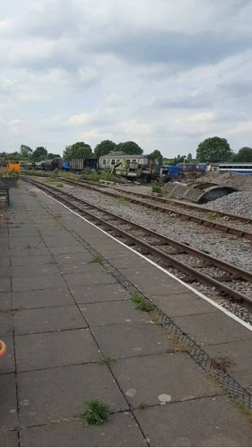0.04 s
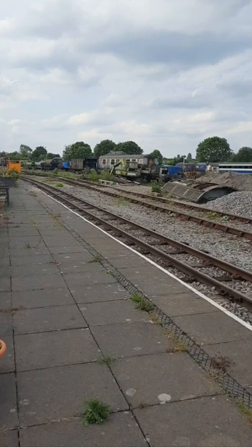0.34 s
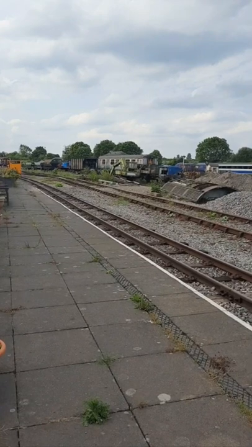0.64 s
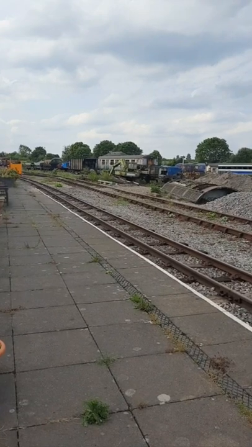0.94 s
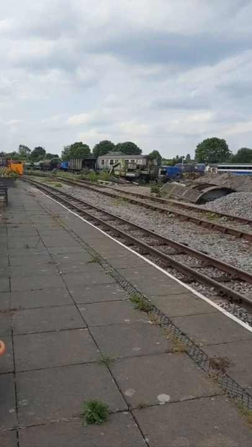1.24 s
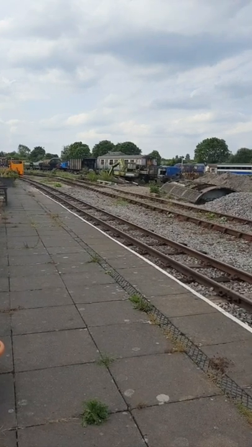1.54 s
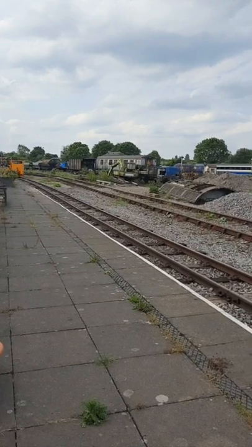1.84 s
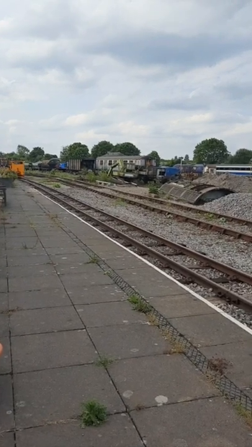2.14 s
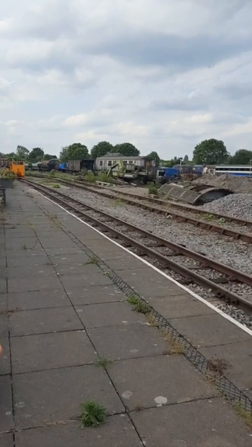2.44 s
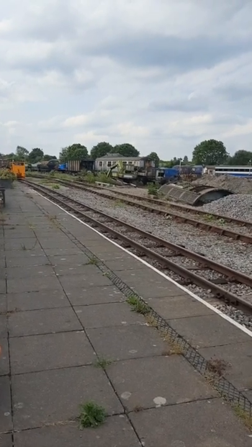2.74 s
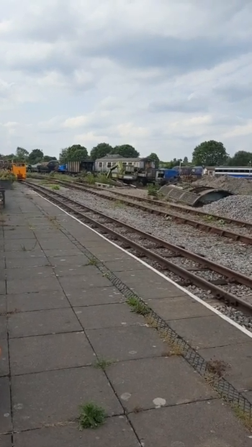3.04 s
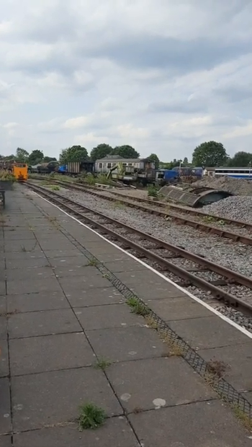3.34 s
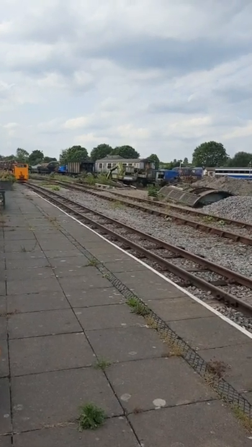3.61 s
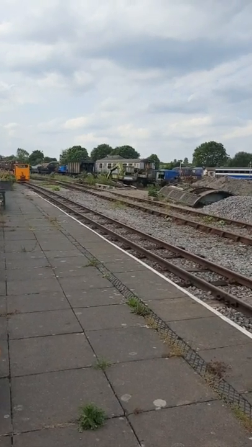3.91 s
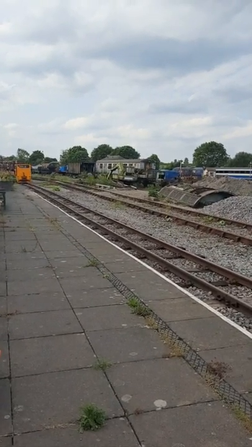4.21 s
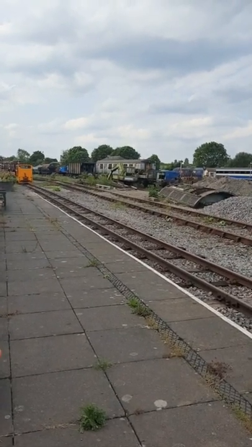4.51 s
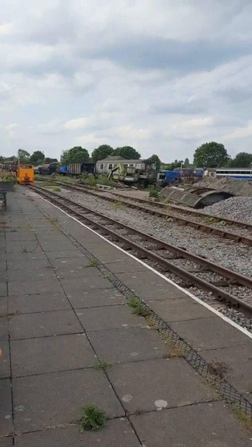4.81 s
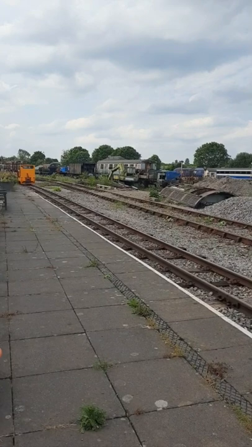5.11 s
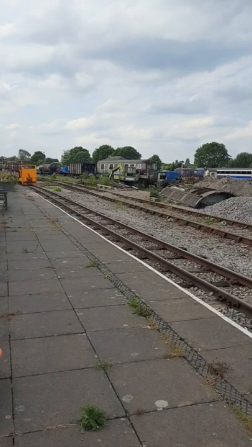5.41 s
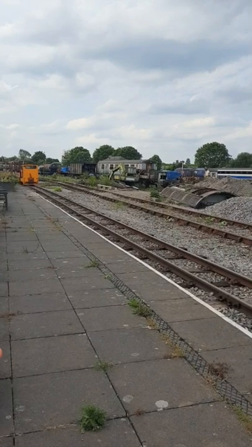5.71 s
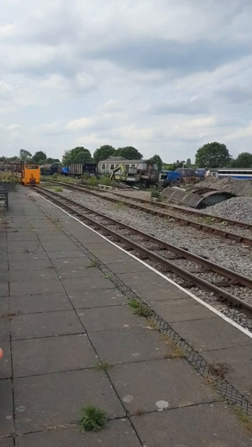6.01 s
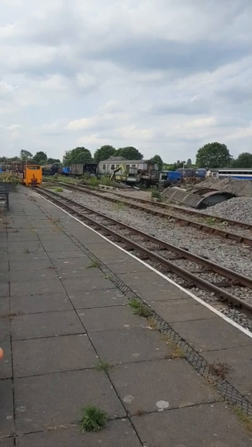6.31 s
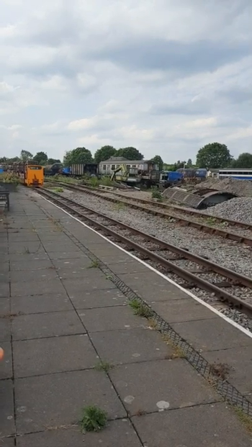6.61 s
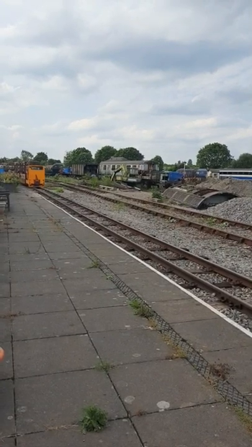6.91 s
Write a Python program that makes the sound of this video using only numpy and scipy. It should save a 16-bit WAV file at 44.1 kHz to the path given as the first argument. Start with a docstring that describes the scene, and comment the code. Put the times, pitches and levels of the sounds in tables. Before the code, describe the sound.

A small diesel locomotive chugs at an even pace some way off in an open rail yard, heard from a platform. Its low exhaust throbs with a hollow, pulsing hum. As it creeps closer the sound grows slightly louder and brighter, with rapid metallic knocking, a light casing rattle and a soft hiss coming forward. A few dull thumps and faint ticks pass.

```python
"""A low, distant chug is heard first: a small three-cylinder diesel locomotive creeps towards a platform.
Puffs of gas drive the exhaust, the tail pipe resonates in two booms per engine cycle, and two knocks
per firing ring the block and its casing; all of it slowly grows louder. Turbulence at the fan and
running gear adds a soft hiss, and a few dull thumps, ticks, swishes and a faint bird pass.
Two microphone ports hear the scene from the left."""
import sys
import numpy as np
from scipy import signal
from scipy.fft import rfft, irfft
from scipy.io import wavfile
from scipy.ndimage import uniform_filter1d

SR = 44100
rng = np.random.default_rng(int(sys.argv[2]) if len(sys.argv) > 2 else 0)


def unload_wav(signal):
    """Save mono or channel-first audio to the path in sys.argv[1] as 16-bit WAV at rate SR, clipped to [-1, 1]."""
    wavfile.write(
        sys.argv[1],
        SR,
        np.round(np.clip(np.atleast_2d(signal).T, -1, 1) * 32767).astype(np.int16),
    )


N = 315315
TIME = np.arange(N) / SR
BINS = np.maximum(np.fft.rfftfreq(N, 1 / SR), 1)
FIRINGS_PER_CYCLE = 3

# engine speed: (time [s], firing rate [Hz])
FIRING_RATE = [(0.0, 19.518), (0.5, 19.406), (1.0, 18.814), (1.5, 19.262), (2.0, 19.327), (3.0, 19.328),
               (4.0, 19.305), (5.0, 19.233), (6.0, 19.154), (7.15, 19.193)]
# pipe booms in a cycle, soft then strong: (place [firings], relative level [dB], half length [firings])
BOOM_PATTERN = [(1.22, -3.5, .42), (2.38, 0, .3)]
# modes of the block: (frequency [Hz], relative level at mid-scene [dB], drift [dB/s], t60 [s])
BLOCK_MODES = [(1748, -2.5, 1.5, 0.041), (1937, -1.5, 1.5, 0.03), (2130, -10, 0, 0.02),
               (2158, -2.5, -0.5, 0.036), (2208, -4.5, -1.5, 0.039), (2450, -12, -3.5, 0.027),
               (2517, -6, -1, 0.04)]
# knocks harder than the rest: (time [s], relative level [dB], frequency [Hz])
HARD_BLOWS = [(2.31, -45, 2174), (4.642, -47, 2140), (4.665, -49.8, 2150), (4.821, -49.6, 2024),
              (5.134, -44.5, 2121), (5.213, -49.3, 2046), (5.288, -46.5, 2145), (5.393, -49.4, 2091),
              (5.424, -48.8, 2109), (5.448, -45, 2144), (5.759, -48, 2001), (5.79, -49, 2088),
              (6.154, -47, 2214), (6.177, -44, 2051), (6.23, -51, 2006), (6.382, -47, 2000),
              (6.49, -48.7, 2127), (6.696, -44.5, 2204), (6.746, -46, 2034), (6.801, -45, 2194),
              (6.825, -49.2, 2131), (6.852, -49, 2036), (6.967, -52, 1968), (6.993, -55, 2030),
              (7.034, -43.5, 2005), (7.113, -47, 2132)]


def from_db(db):
    """Amplitude ratio of a level in decibels."""
    return 10 ** (np.asarray(db) / 20)


def rms_one(x):
    """Normalisation to unit rms."""
    return x / np.sqrt(np.mean(x ** 2) + 1e-20)


def in_time(rows):
    """Linear interpolation of each column after the time column, at every sample."""
    times, *columns = np.transpose(rows)
    return [np.interp(TIME, times, column) for column in columns]


def over_hz(points):
    """Interpolation of a table at every bin, on a logarithmic frequency axis."""
    hz, value = np.transpose(points)
    return np.interp(np.log(BINS), np.log(hz), value)


def stray(span_s):
    """Low-pass noise: a random wander of unit rms."""
    size = max(int(span_s * SR), 1)
    return rms_one(uniform_filter1d(uniform_filter1d(rng.standard_normal(N), size), size))


def swells(rows):
    """Superposed Gaussian envelopes, from rows of (time [s], height, half length [s])."""
    out = np.zeros(N)
    for s, height, half_s in rows:
        near = slice(*np.searchsorted(TIME, [s - np.pi * half_s, s + np.pi * half_s]))
        out[near] += height * np.exp(-((TIME[near] - s) / half_s) ** 2)
    return out


def tone_bursts(rows, rise_s, fall_s):
    """Wave packets that swell and die, from rows of (time [s], level [dB], frequency [Hz])."""
    out = np.zeros(N)
    for s, db, hz in rows:
        near = slice(*np.searchsorted(TIME, [s - np.pi * rise_s, s + np.pi * fall_s]))
        age = TIME[near] - s
        envelope = np.exp(-(age / np.where(age < 0, rise_s, fall_s)) ** 2)
        out[near] -= np.sqrt(2) * from_db(db) * envelope * np.sin(2 * np.pi * hz * age)
    return out


def turbulence(gain):
    """Partly coherent stereo noise: scattering by ground and yard makes the two sides unlike."""
    # likeness of the two sides: (frequency [Hz], coherence [0..1])
    coherence = [(60, 0.63), (130, 0.9), (300, 0.95), (480, 0.81), (600, 0.42), (900, 0.25), (1300, 0.7),
                 (2000, 0.55), (2500, 0.87), (3200, 0.1), (6000, 0.11), (12000, 0.13)]
    alike = np.clip(over_hz(coherence), 0, 1)
    mid, side = rng.standard_normal((2, len(BINS))) + 1j * rng.standard_normal((2, len(BINS)))
    spectrum = np.sqrt(1 + alike) * mid + np.sqrt(1 - alike) * side * [[1], [-1]]
    return rms_one(irfft(gain * spectrum, N))


def coloured(spectrum):
    """Band-limited noise, shaped by rows of (frequency [Hz], relative density [dB])."""
    inside = (BINS > spectrum[0][0]) & (BINS < spectrum[-1][0])
    return turbulence(from_db(over_hz(spectrum)) * inside)


def resonant(peaks):
    """Noise through narrow resonances, from rows of (frequency [Hz], width [Hz], relative level [dB])."""
    return turbulence(sum(from_db(db) / (1 + (2 * (BINS - hz) / width) ** 2) for hz, width, db in peaks))


def ring(force, hz, t60):
    """A damped oscillator: each impulse starts a sine that falls 60 dB in t60 seconds."""
    decay, step = from_db(-60 / (t60 * SR)), 2 * np.pi * hz / SR
    return signal.lfilter([0, np.sin(step)], [1, -2 * decay * np.cos(step), decay ** 2], force + 1e-18)


def steadied(x, share, span_s):
    """Compression of slow swells: an engine delivers much the same energy on every stroke."""
    power = uniform_filter1d(np.mean(x ** 2, axis=0), max(int(span_s * SR), 1))
    return rms_one(x / (np.abs(power) + 1e-6) ** (share / 2))


def blows(crank, pattern, scatter_db, jitter_s):
    """A quasi-periodic impulse train: each blow of the cycle varies a little in strength and time."""
    clicks = np.zeros(N)
    cycles = np.arange(0, crank[-1], FIRINGS_PER_CYCLE)
    for place, level_db in pattern:
        chance = rng.standard_normal((len(cycles), 2))
        due_s = np.interp(cycles + place, crank, TIME, right=2 * TIME[-1])
        at = ((due_s + jitter_s * chance[:, 0]) * SR).astype(int)
        inside = (at >= 0) & (at < N)
        clicks[at[inside]] += from_db(level_db + scatter_db * chance[inside, 1])
    return clicks


def throb(clicks, rise_s, fall_s, wash):
    """Energy envelope of blows that build and decay; a steady wash stands for the yard's echoes."""
    power = clicks ** 2
    for seconds in (rise_s, fall_s):
        power = signal.lfilter([1], [1, -np.exp(-1 / (seconds * SR))], power + 1e-18)
    return rms_one(np.sqrt(power / power.mean() + wash))


def surge(crank, booms, wash):
    """Periodic envelope: rounded swells in every engine cycle add in power to a steady wash."""
    half_cycle = FIRINGS_PER_CYCLE / 2
    power = np.zeros(N)
    for place, db, half_length in booms:
        offset = (crank - place + half_cycle) % FIRINGS_PER_CYCLE - half_cycle
        power += from_db(db) ** 2 * np.exp(-(offset / half_length) ** 2)
    return rms_one(np.sqrt(power / power.mean() + wash))


def microphone_hiss():
    """Self-noise of the microphones: a stationary treble floor."""
    # noise floor: (frequency [Hz], relative density [dB])
    floor_spectrum = [(2500, -11), (4000, -6.5), (6000, -0.5), (8000, -3), (11000, -18), (15500, -4.5)]
    return from_db(-77) * coloured(floor_spectrum)


def bird():
    """Frequency glides: each far whistle is a thin sine that falls as it fades in and out."""
    # whistles: (start [s], length [s], first frequency [Hz], last frequency [Hz], level [dB])
    whistles = [(1.96, .2, 8750, 8450, -80), (4.98, .19, 8350, 6700, -75)]
    out = np.zeros(N)
    for s, length_s, start_hz, end_hz, db in whistles:
        along = np.clip((TIME - s) / length_s, 0, 1)
        hz = start_hz + (end_hz - start_hz) * along
        out += from_db(db) * np.sin(np.pi * along) * np.sin(2 * np.pi * np.cumsum(hz) / SR)
    return out


def swishes():
    """Amplitude modulation of treble noise by brief, soft swells."""
    # swishes: (time [s], level [dB], half length [s])
    events = [(-0.002, -64.5, 0.079), (0.184, -72, 0.21), (0.663, -63, 0.15), (1.346, -73.5, .07),
              (1.949, -78, .08), (2.64, -68, 0.3), (4.683, -63.5, 0.33)]
    # their colour: (frequency [Hz], relative density [dB])
    spectrum = [(2300, -3.5), (2550, -3.5), (2850, -4.5), (3300, -15.5), (3700, -12), (3920, -5),
                (4150, -12.5), (4600, -10.5), (5100, -6.5), (5800, -5.5), (6700, -5), (7500, -14.5),
                (9200, -22.5), (11000, -17.5), (15500, -29)]
    envelope = sum(from_db(db) * np.exp(-((TIME - s) / half_s) ** 2) for s, db, half_s in events)
    return coloured(spectrum) * envelope


def ticks(spread):
    """Exponentially decaying noise transients: clicks and scuffs, the longer ones starting more softly."""
    # ticks and scuffs: (time [s], relative level [dB], band centre [Hz], decay [s])
    events = [(1.891, -61, 3700, 0.08), (1.999, -65, 3400, 0.056), (2.308, -53, 2910, 0.0067),
              (3.521, -57, 3000, 0.011), (3.7, -51.5, 3584, 0.021), (3.714, -51, 1600, 0.039),
              (4.258, -54, 8200, .003), (5.525, -63, 8000, .02)]
    out, age = np.zeros((2, N)), TIME[:SR // 4]
    for s, db, hz, fall_s in events:
        band = signal.butter(2, [hz / (1 + spread), hz * (1 + spread)], "band", fs=SR, output="sos")
        noise = rms_one(signal.sosfilt(band, rng.standard_normal((2, len(age)))))
        envelope = (1 - np.exp(-10 * age / fall_s)) * np.exp(-age / fall_s)
        start = int(s * SR)
        out[:, start:start + len(age)] += from_db(db) * envelope * noise
    return out


def thumps():
    """Low-frequency wave packets: each dull thump is a few deep, round cycles."""
    # thumps that stand out of the chug: (time [s], relative level [dB], frequency [Hz])
    events = [(0.469, -30, 121), (1.421, -27.5, 215), (3.091, -35, 110.4), (3.711, -33.5, 132),
              (3.862, -33, 141), (4.185, -29.5, 148), (5.397, -24.5, 136), (5.443, -35, 165),
              (5.782, -32.5, 128.7), (5.841, -37, 125), (6.151, -26, 111), (6.812, -30.5, 176.2),
              (6.959, -29, 236.2)]
    return from_db(-3) * tone_bursts(events, rise_s=.008, fall_s=.012)


def fan_and_gear():
    """Broadband noise of fan and running gear; its top carries only a short way, so nearing brightens it."""
    # growth of the hiss: (time [s], level [dB])
    hiss_level = [(0, -79.5), (1.2, -76.5), (1.5, -74.5), (2.2, -70), (2.9, -69), (3.3, -71.5),
                  (3.8, -63.5), (5.15, -66.5), (5.7, -62), (6.5, -62), (6.7, -60), (6.95, -57.5),
                  (7.15, -60)]
    # main hiss: (frequency [Hz], relative density [dB])
    hiss_spectrum = [(2200, -38), (2900, -3), (3500, -3.5), (4500, -1), (6000, -3), (7500, -4.5),
                     (9000, -11.5), (10000, -12), (11200, -11), (12200, -18), (15500, -36)]
    # highest hiss: (frequency [Hz], relative density [dB])
    fine_spectrum = [(9300, -5), (10500, 0.5), (11500, -9), (12200, -8), (13200, -7.5), (15500, -12.5)]
    # faint whine of the fan: (frequency [Hz], width [Hz], relative level [dB])
    whine_peaks = [(5340, 80, -5), (5960, 240, -6), (6600, 150, -7)]
    fine_end_db, fine_rise_db_per_s = -69, 7
    hiss_db, = in_time(hiss_level)
    fine = from_db(fine_end_db + fine_rise_db_per_s * (TIME - TIME[-1])) * coloured(fine_spectrum)
    return from_db(hiss_db) * (coloured(hiss_spectrum) + from_db(-9.5) * resonant(whine_peaks)) + fine


def drive_whine():
    """Random frequency and amplitude modulation make the drive's thin, sinking tone flutter."""
    # course of the whine: (time [s], frequency [Hz], level [dB])
    course = [(0, 770, -73.5), (1.15, 768, -67.5), (1.4, 766, -62), (1.8, 764, -68.5), (2.2, 760, -58),
              (2.7, 757, -65.5), (3.0, 753, -68.5), (3.5, 747, -61.5), (4.5, 738, -65), (5.2, 722, -63),
              (7.15, 706, -65.5)]
    stray_hz, flutter_db = 6, 5
    hz, db = in_time(course)
    tone = np.cos(2 * np.pi * np.cumsum(hz + stray_hz * stray(.03)) / SR)
    return from_db(db) * rms_one(tone * from_db(flutter_db * stray(.035)))


def clangs():
    """A loose casing panel vibrates in short swells, randomly modulated in pitch and level."""
    # clangs: (time [s], relative level [dB], frequency [Hz])
    events = [(0.708, -52.5, 653), (1.402, -51, 767), (2.312, -49, 758), (2.639, -47.5, 768),
              (3.285, -51, 748), (3.751, -47.5, 708), (4.143, -51.5, 751), (4.278, -48.5, 716),
              (4.308, -53, 690.6), (5.135, -54, 720), (5.392, -47.5, 793), (5.851, -47, 729),
              (5.941, -48, 741), (6.126, -53, 705), (6.361, -46.5, 914), (6.712, -44.5, 715),
              (6.866, -48, 682), (7.005, -48.5, 703)]
    half_s, waver_hz, rattle_db = 0.027, 8.9, 3
    waver = np.cumsum(waver_hz * stray(0.0086)) / SR
    out = np.zeros(N)
    for s, db, hz in events:
        near = np.abs(TIME - s) < .1
        envelope = from_db(db - 1) * np.exp(-((TIME[near] - s) / half_s) ** 2)
        out[near] += envelope * np.cos(2 * np.pi * (hz * TIME[near] + waver[near]))
    return out * from_db(rattle_db * stray(0.0032))


def casing_panels(crank):
    """Narrow panel resonances swell on every second engine cycle and rattle unevenly in between."""
    # resonances: (frequency [Hz], width [Hz], relative level at mid-scene [dB], drift [dB/s])
    resonances = [(708, 38, -8, 0.7), (772, 53, -4.5, 0.0), (912, 57, -14.5, 2.5), (1122.5, 20, -9.5, 0.36),
                  (2510, 6.1, -16.5, 2.1)]
    swell_db, crest_firings, flutter_db = 4.5, 3.1, 5
    swell = from_db(swell_db * np.cos(np.pi * (crank - crest_firings) / FIRINGS_PER_CYCLE))
    panels = np.zeros((2, N))
    for hz, width, db, drift in resonances:
        singing = steadied(resonant([(hz, width, 0)]), share=0.15, span_s=0.16)
        panels += from_db(db + drift * (TIME - TIME.mean())) * singing
    return rms_one(panels * swell * from_db(flutter_db * stray(0.021)))


def struck_block(strikes):
    """Modal response of the block, band-passed by the casing; the balance of the modes flickers."""
    flicker_db = 3.5
    casing_band = signal.butter(2, [1730, 2680], "band", fs=SR, output="sos")
    modes = np.zeros((2, N))
    for hz, db, drift, t60 in BLOCK_MODES:
        level_db = db + drift * (TIME - TIME.mean()) + flicker_db * stray(0.024)
        modes += from_db(level_db) * ring(strikes, hz, t60)
    return signal.sosfilt(casing_band, modes)


def hard_knocks():
    """Free vibration after impact: short blows, each at its own pitch, leave the block ringing."""
    blow = tone_bursts(HARD_BLOWS, rise_s=.0025, fall_s=.003)
    ringing = blow.std() * rms_one(sum(ring(blow, hz, t60) for hz, _, _, t60 in BLOCK_MODES))
    return from_db(-3) * (blow + from_db(-6) * ringing)


def engine_body(crank):
    """Impact excitation: combustion and valve gear ring the block, and the casing rattles in step."""
    # the engine coming into the open: (time [s], relative casing level [dB], relative knock level [dB])
    levels = [(0.0, -57, -66.5), (0.18, -62.5, -73), (.36, -63, -76), (.47, -64, -71), (.6, -61, -73),
              (1.23, -61.5, -73), (1.39, -60, -70), (1.51, -59.5, -65), (2.15, -57, -64),
              (2.33, -56.5, -59.5), (2.47, -60, -65.5), (2.63, -58.5, -62.5), (2.87, -59.5, -65),
              (3.78, -55, -60), (3.9, -56.5, -60), (7.05, -55, -55), (7.15, -54, -57.5)]
    # knocks in one cycle: (place [firings], relative level [dB])
    knock_pattern = [(0.37, 5.9), (0.751, 9.2), (1.358, 12), (1.79, 11.1), (2.342, 12.3), (2.791, 10.8)]
    # scattered knocks: (frequency [Hz], relative density [dB])
    knock_spectrum = [(1300, -21), (1650, -6.5), (1900, -6), (2150, -3.5), (2350, -7), (2550, -8.5),
                      (2800, -13), (3600, -25.5)]
    # casing rattle: (frequency [Hz], relative density [dB])
    rattle_spectrum = [(430, -25), (560, 0.5), (650, 1.5), (725, 0.5), (790, -1), (880, -3), (1050, -5),
                       (1220, -7.5), (1450, -14), (2000, -63)]
    casing_db, knock_db = in_time(levels)
    knocks = blows(crank, knock_pattern, scatter_db=1.3, jitter_s=0.0012)
    # the usual knock gives way to a hard one
    knocks *= np.clip(1 - swells([(s, 1, .006) for s, _, _ in HARD_BLOWS]), .5, 1)
    # each strike is a click plus a rough burst of a few milliseconds
    strikes = 1.2 * rms_one(knocks) + turbulence(1) * throb(knocks, rise_s=.0015, fall_s=.0015, wash=0)
    block = steadied(struck_block(strikes), share=.3, span_s=.026)
    scattered = coloured(knock_spectrum) * throb(knocks, rise_s=0.0015, fall_s=0.003, wash=4.4)
    rattle = coloured(rattle_spectrum) * throb(knocks, rise_s=0.0055, fall_s=0.006, wash=2.1)
    panels = casing_panels(crank) * throb(knocks, rise_s=0.0033, fall_s=.008, wash=2.6)
    return (from_db(knock_db) * (from_db(-4.0) * block + from_db(0.34) * scattered)
            + from_db(casing_db) * (from_db(1.68) * rattle + from_db(-5) * panels))


def exhaust_hum(crank):
    """Harmonics of the firing rate: each puff pushes, then sucks; their balance shifts on approach."""
    # harmonics: (order [multiple of the firing rate], level far off [dB], level close by [dB])
    harmonics = [(2, -61.5, -63), (3, -53, -45), (4, -53, -54.5), (5, -57, -53.5), (6, -56.5, -49),
                 (7, -59.5, -53)]
    close_s, close_span_s, turn_firings = 4.786, .3, .425
    close = .5 + .5 * np.tanh((TIME - close_s) / close_span_s)
    phase = 2 * np.pi * (crank - turn_firings)
    return -np.sqrt(2) * sum(from_db(far_db + (near_db - far_db) * close) * np.sin(order * phase)
                             for order, far_db, near_db in harmonics)


def tail_pipe(crank):
    """Pipe resonance: one note swells and bends with each boom; loud booms impose their own pitch."""
    # the ringing pipe: (time [s], relative level [dB])
    levels = [(0, -42), (.45, -41), (.75, -40), (1.05, -40.5), (1.4, -43.5), (1.85, -44), (2.45, -41.5),
              (2.8, -43.5), (3.1, -45), (3.3, -42.5), (3.7, -40.5), (4.45, -38.5), (4.95, -42), (5.5, -39),
              (6.2, -42), (6.85, -37.5), (7.15, -51)]
    # resonances of the pipe: (frequency [Hz], width [Hz], relative level [dB])
    resonances = [(297.5, 19, -4.5), (317, 27, -8), (335.2, 14, -5)]
    # booms that stand out: (time [s], relative level [dB], frequency [Hz], half length [s])
    loud_booms = [(0.684, -34.1, 322.2, 0.031), (0.746, -32, 322.5, 0.022), (1.069, -31.5, 318, 0.012),
                  (3.097, -35, 332, 0.012), (4.027, -35.5, 327, 0.019), (4.181, -31, 331.7, 0.015),
                  (4.326, -33.7, 326, 0.014), (4.443, -33, 320.7, 0.012), (4.493, -32, 329.3, 0.014),
                  (5.261, -35, 322.7, 0.0089), (5.426, -31.1, 336, 0.016), (5.516, -30, 335.2, 0.012),
                  (5.567, -34, 339, 0.019), (5.665, -31.0, 319.1, 0.013), (5.739, -34, 328.8, 0.025),
                  (5.892, -32.5, 327, 0.022), (6.042, -32, 326, 0.02), (6.152, -30.5, 324.5, 0.021),
                  (6.206, -31.5, 330.2, 0.015), (6.36, -31.2, 332, 0.019), (6.452, -31, 325, 0.014),
                  (6.521, -30.5, 328.5, 0.016), (6.669, -28.5, 333, 0.012), (6.757, -33, 321.4, 0.018),
                  (6.84, -30.5, 332.5, 0.022), (6.938, -31.5, 331, 0.016), (6.97, -30, 324, 0.012),
                  (7.142, -26, 335, 0.013)]
    order = 50 / 3   # the multiple of the firing rate that the pipe favours
    bend_hz, stray_hz, scatter_db = 14, 2.2, 1.5
    level_db, = in_time(levels)
    firing_hz, = in_time(FIRING_RATE)
    swell = surge(crank, BOOM_PATTERN, wash=.06)
    loud_weight = swells([(s, 1, half_s) for s, _, _, half_s in loud_booms])
    usual_weight = np.clip(1 - loud_weight, 0, 1) ** 2
    usual_hz = order * firing_hz + bend_hz * (swell - swell.mean()) + stray_hz * stray(.12)
    weighted_loud_hz = swells([(s, hz, half_s) for s, _, hz, half_s in loud_booms])
    note_hz = (usual_weight * usual_hz + weighted_loud_hz) / (usual_weight + loud_weight)
    note = rms_one(np.cos(2 * np.pi * np.cumsum(note_hz) / SR))
    breath = from_db(-8) * resonant(resonances)
    tone = steadied(note + breath, share=0.6, span_s=0.04)
    usual_gain = usual_weight * swell * from_db(level_db - 0.5 + scatter_db * stray(.12))
    loud_gain = swells([(s, from_db(db - 0.8), half_s) for s, db, _, half_s in loud_booms])
    return tone * (usual_gain + loud_gain)


def exhaust(crank):
    """Pulsating flow: puffs of gas modulate a low chug and the silencer's drone, beside hum and pipe."""
    # relative levels of the bands on approach: (time [s], chug [dB], drone [dB], upper skirt [dB])
    levels = [(0, -37, -49, -44), (0.3, -47, -45.5, -49.5), (0.7, -39.5, -44, -47),
              (1.1, -40.5, -43.5, -43), (1.45, -41, -37.5, -45.5), (1.9, -41.5, -45, -47),
              (2.3, -38.5, -42, -45), (2.85, -44, -48, -48.5), (3.1, -39.5, -42, -46.5),
              (3.35, -46.5, -50, -45), (3.9, -37, -42, -43.5), (4.3, -41, -42.5, -45.5),
              (4.75, -41.5, -46.5, -46), (5.45, -39.5, -39.5, -42.5), (5.9, -39.5, -42.5, -44),
              (6.5, -37, -41.5, -45), (6.85, -36.5, -36, -40), (7.15, -42, -36, -32.5)]
    # puffs in one cycle: (place [firings], relative level [dB])
    puff_pattern = [(.36, 9), (1.36, 6.5), (2.36, 9.5)]
    # low chug: (frequency [Hz], relative density [dB])
    chug_spectrum = [(15, -39), (30, -13), (42, -11), (56, 9.5), (80, 11.5), (110, 9), (150, 8),
                     (200, -38.5)]
    # silencer's drone: (frequency [Hz], relative density [dB])
    drone_spectrum = [(110, -20.5), (150, 3), (190, 6.5), (215, 4), (255, 8), (285, 8.5), (303, 8.5),
                      (340, -49.5)]
    # skirt above the pipe's note: (frequency [Hz], relative density [dB])
    skirt_spectrum = [(325, -8), (358, 1), (395, -3), (440, -6), (490, -10.5), (550, -21.5), (700, -77)]
    chug_db, drone_db, skirt_db = in_time(levels)
    puffs = blows(crank, puff_pattern, scatter_db=2.5, jitter_s=0.00065)
    chug = steadied(coloured(chug_spectrum), share=0.55, span_s=0.04)
    chug *= throb(puffs, rise_s=0.0019, fall_s=0.009, wash=1.3)
    drone = steadied(coloured(drone_spectrum), share=0.17, span_s=0.035)
    drone *= throb(puffs, rise_s=0.0023, fall_s=0.018, wash=2.1)
    skirt = steadied(coloured(skirt_spectrum), share=0.35, span_s=0.067)
    skirt *= surge(crank, BOOM_PATTERN[1:], wash=8)   # only the strong boom reaches this high
    return (exhaust_hum(crank) + from_db(chug_db - 2.0) * chug + from_db(drone_db + 1.68) * drone
            + tail_pipe(crank) + from_db(skirt_db + 0.07) * skirt)


def scene():
    """Superposition: one crank times exhaust and engine body; hiss and small yard sounds lie on top."""
    firing_hz, = in_time(FIRING_RATE)
    crank = -.103 + np.cumsum(firing_hz) / SR   # position, counted in firings
    dip = from_db(-8 * np.exp(-((TIME - 2.908) / 0.021) ** 2))   # the level dips briefly
    engine = dip * (exhaust(crank) + engine_body(crank) + drive_whine()) + hard_knocks() + clangs()
    hiss = microphone_hiss() + fan_and_gear()
    return engine + hiss + thumps() + ticks(spread=0.42) + swishes() + bird()


def record(dry):
    """Level and phase differences: short waves reach the left port first; the top octave is cut short."""
    # colour of the ports: (frequency [Hz], left minus right level [dB])
    level_difference = [(60, -2.5), (200, 0), (400, 0.5), (520, -2.5), (620, -1), (1050, 2.5), (2300, -2.5),
                        (3100, 0.5), (3800, 4.5), (4700, 3.5), (6000, -5), (8000, 1), (10300, 5),
                        (13000, -1)]
    # lead of the left port: (frequency [Hz], phase [rad])
    phase_lead = [(200, 0), (500, .2), (620, 1.4), (900, 1.8), (1150, 5.2), (1600, 6.5), (1900, 6.0),
                  (2500, 7.4), (2900, 9.2), (3500, 12.2), (4900, 16), (6300, 21), (15000, 30)]
    cutoff_hz = 15300
    sides = np.array([[.5], [-.5]])
    ports = from_db(over_hz(level_difference) * sides) * np.exp(1j * over_hz(phase_lead) * sides)
    top_cut = 1 / np.sqrt(1 + (BINS / cutoff_hz) ** 240)
    soft_ends = signal.windows.tukey(N, .001)
    return irfft(rfft(dry * soft_ends) * ports * top_cut, N)


dry = scene()
out = record(dry)
unload_wav(out)
```